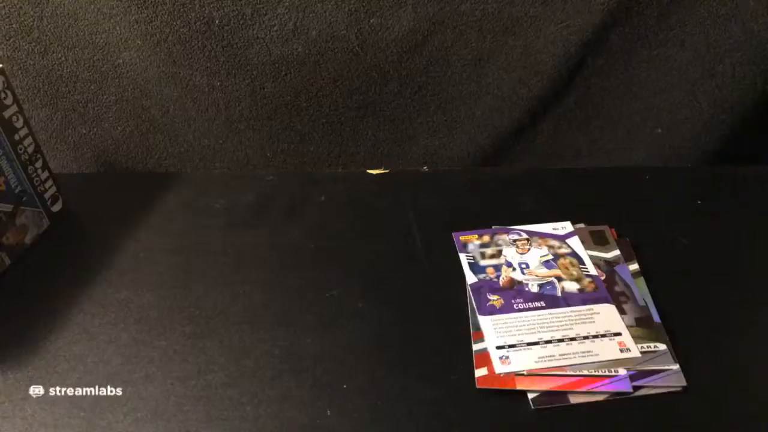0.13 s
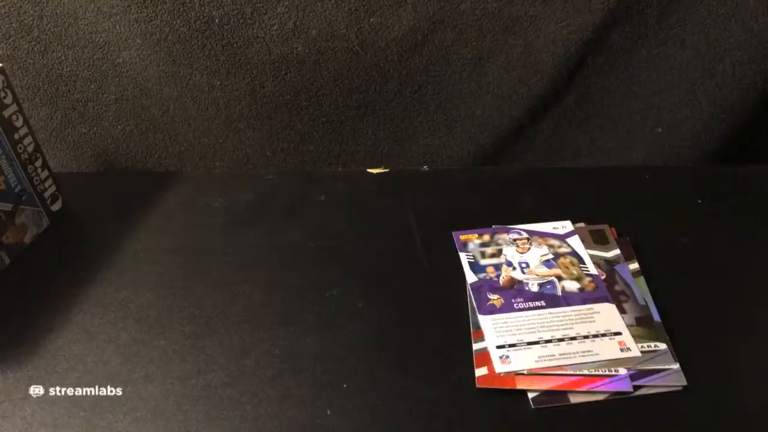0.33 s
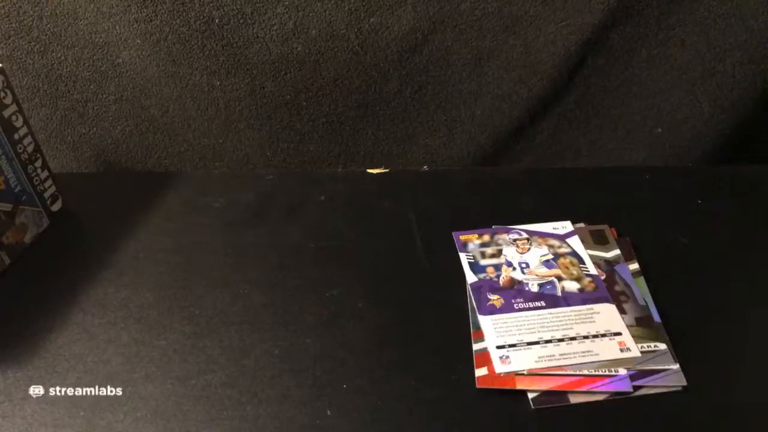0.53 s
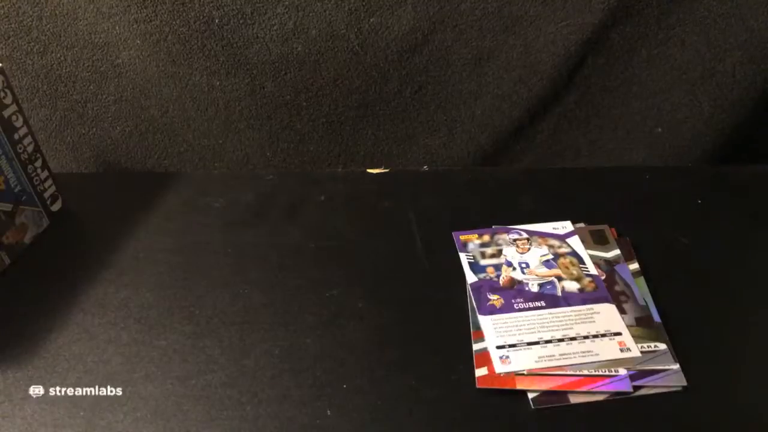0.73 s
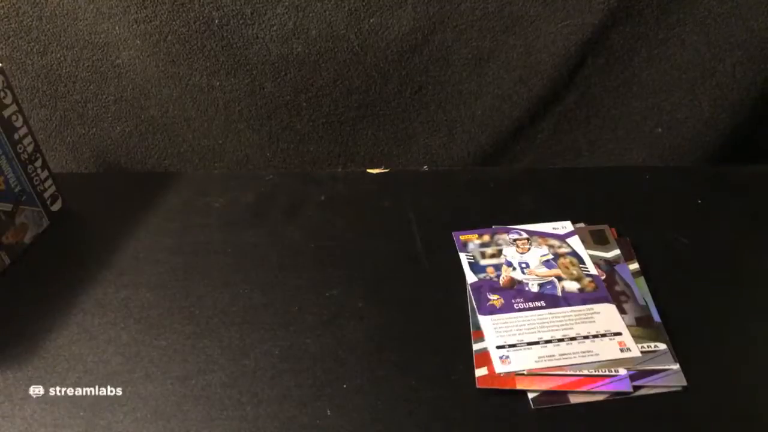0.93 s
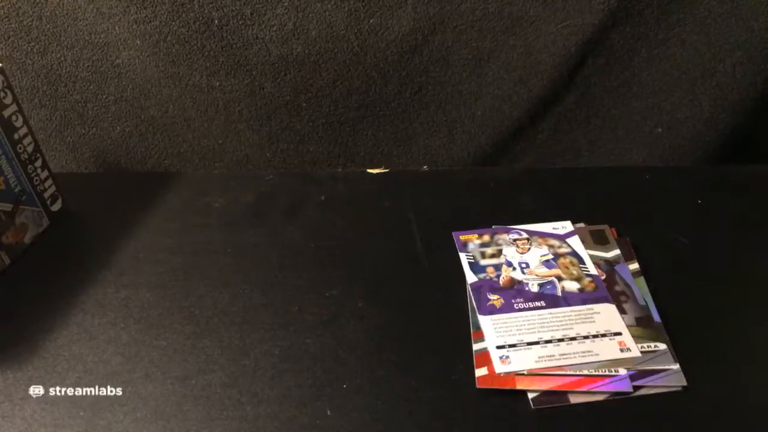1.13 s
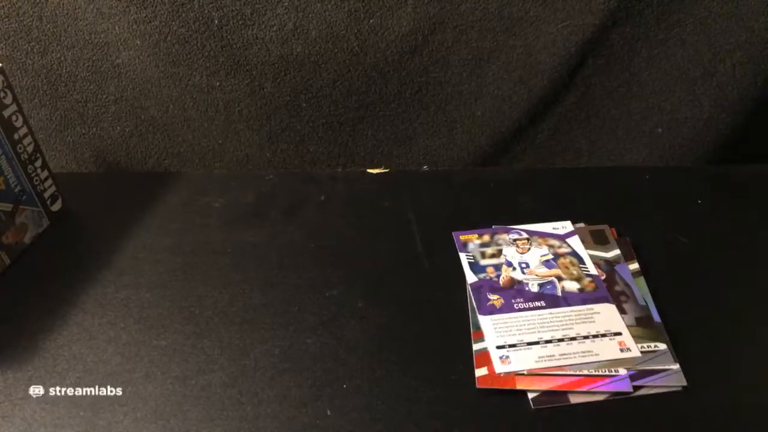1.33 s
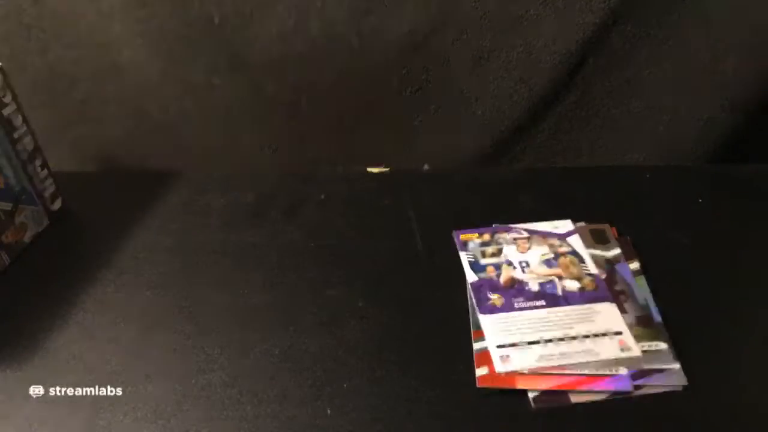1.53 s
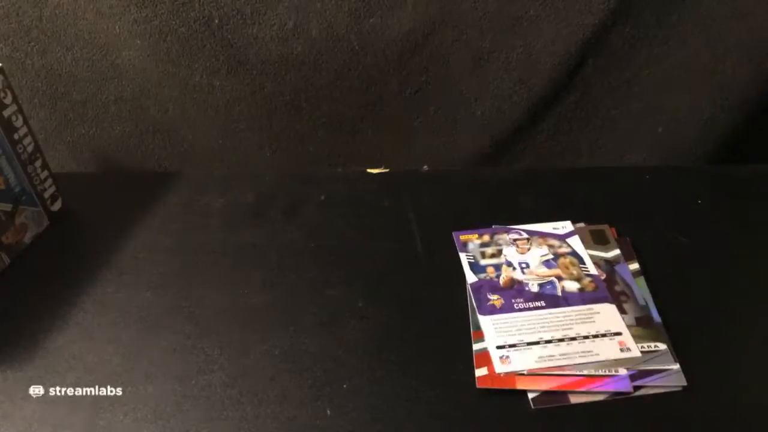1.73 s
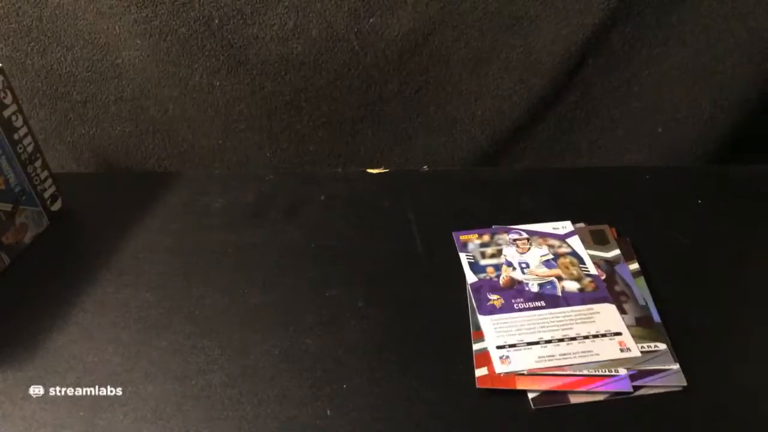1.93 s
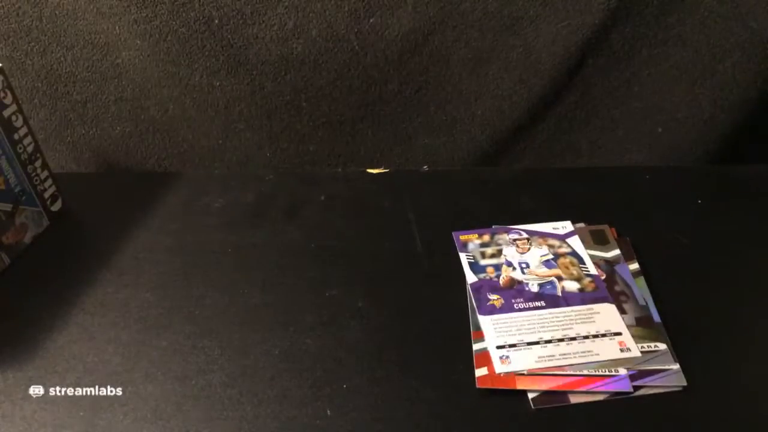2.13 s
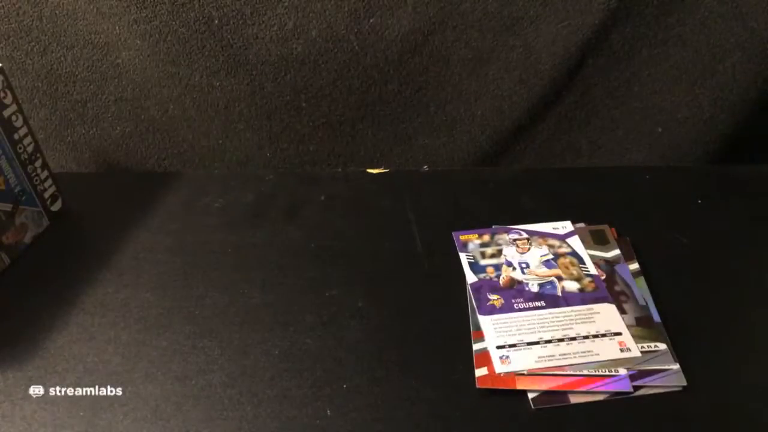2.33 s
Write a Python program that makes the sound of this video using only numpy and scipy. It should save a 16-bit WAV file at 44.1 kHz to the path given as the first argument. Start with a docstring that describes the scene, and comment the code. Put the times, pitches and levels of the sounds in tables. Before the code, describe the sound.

A loud, dull knock on a table lands with a deep thud and tiny bounces, and a softer knock follows about a second later. The microphone picks both up through the tabletop, over faint steady room hiss.

```python
"""A faint steady hiss runs throughout. At 0.25 s a dull knock on a table, with small bounces, touches
the recorder's ceiling; a softer one follows at 1.56 s, and very faint contacts fall between and after.
Each reaches the microphone through the table top, treble first and bass ever later, so a knock
is a quick falling sweep that ends in a deep thud."""
import sys
import numpy as np
from scipy import signal
from scipy.fft import rfft, irfft, next_fast_len
from scipy.io import wavfile
from scipy.ndimage import uniform_filter1d, map_coordinates

SR = 44100
rng = np.random.default_rng(int(sys.argv[2]) if len(sys.argv) > 2 else 0)


def pcm_store(signal):
    """Save signal as 16-bit PCM."""
    levels = np.round(np.clip(np.atleast_2d(signal), -1, 1) * 32767)
    wavfile.write(sys.argv[1], SR, levels.astype(np.int16).T)


N = 105840  # 2.4 s


def amp(db):
    """Gain of a level in dB."""
    return 10 ** (np.asarray(db) / 20)


def unit_rms(x):
    """x at rms 1."""
    return x / np.sqrt(np.mean(x ** 2) + 1e-20)


def linear_curve(points, hz):
    """(f/Hz, value) points joined by lines over log f."""
    f, values = np.transpose(points)
    return np.interp(np.log(hz + 1), np.log(f + 1), values)


def spline_curve(points, hz):
    """(f/Hz, value) points joined by a spline over log f."""
    f, values = np.transpose(points)
    row = np.interp(np.log(hz + 1), np.log(f + 1), np.arange(len(f)))
    return map_coordinates(values, [row], mode="nearest")


def minimum_phase(db):
    """Causal frequency response with these levels."""
    cepstrum = irfft(np.log(amp(db)))
    half = len(cepstrum) // 2
    cepstrum[1:half] *= 2
    cepstrum[half + 1:] = 0
    return np.exp(rfft(cepstrum))


def hiss(level_db=-46.5, patchy_db=0.36):
    """Steady noise, slightly patchy, strongest near 2.6 kHz."""
    # noise density: f/Hz, level/dB
    density = [(15, -47.5), (25, -13.5), (60, -15.5), (125, -8), (220, -7.5), (580, -8.5), (1200, -8),
               (1650, -8), (2150, -4), (2600, 1), (3100, -5.5), (3900, -12.5), (6000, -22), (8600, -28),
               (9300, -34.5), (12000, -66)]
    hz, _, white = signal.stft(rng.standard_normal(N + SR), SR, nperseg=4096)
    patches = unit_rms(uniform_filter1d(rng.standard_normal(white.shape), size=30, axis=0))
    shape_db = linear_curve(density, hz)[:, None] + patchy_db * patches
    noise = signal.istft(white * amp(shape_db), SR, nperseg=4096)[1]
    return amp(level_db) * unit_rms(noise[SR // 4:][:N])


def knocks():
    """Each blow pushes the table top down and travels through it to the microphone, bass slowest."""
    # blows and bounces: t/s, level/dB, then shifts: deep bass/dB, low mid/dB, high mid/dB, treble/dB
    contacts = [(.2458, 0.2, 1, 0, -0.5, -0.5), (0.2496, -25, 0.5, 4, 3, 7.5),
                (0.3164, -28, 3, 2.5, 1, -9.5), (.398, -46, -4, 13, -8, -8),
                (1.5639, -12.8, 0.5, 1.5, -2, 6.5), (1.5665, -26, -10, -11, 1, 3.5),
                (1.573, -38, 9, 16.5, 7, 1), (1.602, -41, 0, 0, -14, -4), (1.642, -38.5, 3, 0.5, -4.5, 5),
                (.935, -56, 10, 0, -5, -10), (2.125, -55, 9, -7, -7, -7), (2.155, -56.5, 6, -6, -4, -10),
                (1.315, -59, 9, -4, -5, -11)]
    # spectrum the table top passes of one blow: f/Hz, level/dB
    table_top = [(18, 21.7), (30, 32.6), (40, 42.1), (52, 47.9), (70, 52.1), (95, 50), (130, 42),
                         (190, 33.2), (260, 32), (400, 31), (600, 29.8), (800, 23.5), (1050, 23),
                 (1300, 15), (1600, 10), (2150, 9), (2750, 13), (3400, 3), (4600, -14), (5600, -16),
                 (6500, -24), (9000, -32)]
    lag_s, ref_hz, exponent = .01072, 100, -.895  # group delay = lag_s * (f / ref_hz) ** exponent
    stilled_at_s, fade_s = .062, .005
    size = 2 ** 14
    hz = np.fft.rfftfreq(size, 1 / SR)
    t = np.arange(size // 2) / SR
    lag_cycles = lag_s * ref_hz / (1 + exponent) * (hz / ref_hz) ** (1 + exponent)
    dispersion = np.exp(-2j * np.pi * lag_cycles)
    damping = (1 - np.tanh((t - stilled_at_s) / fade_s / 2)) / 2
    out = np.zeros(N + size)
    for start_s, level_db, deep_db, low_db, mid_db, treble_db in contacts:
        shifts = [(45, deep_db), (90, 0), (220, low_db), (700, mid_db), (2700, treble_db)]
        spectrum_db = spline_curve(table_top, hz) + spline_curve(shifts, hz)
        blow = -irfft(minimum_phase(spectrum_db) * dispersion)[:len(t)]
        out[round(start_s * SR):][:len(t)] += amp(level_db) * damping * blow
    return out[:N]


def scene():
    """Hiss and knocks, mono."""
    return (hiss() + knocks())[None]


def record(dry, knee=14, cutoff_hz=9469):
    """Soft ceiling at full scale, then a brick-wall low-pass."""
    limited = dry / (1 + np.abs(dry) ** knee) ** (1 / knee)
    size = next_fast_len(N + SR // 4)
    passband = np.fft.rfftfreq(size, 1 / SR) < cutoff_hz
    return irfft(rfft(limited, size) * passband, size)[:, :N]


dry = scene()
out = record(dry)
pcm_store(out)
```